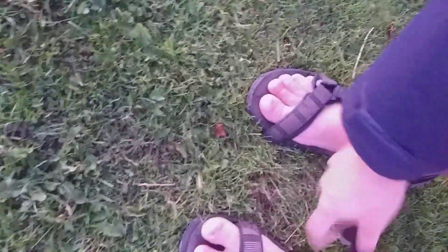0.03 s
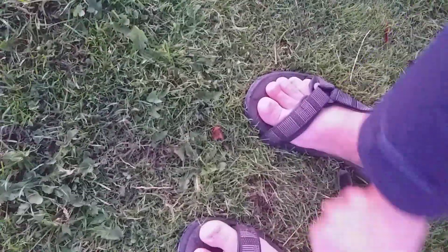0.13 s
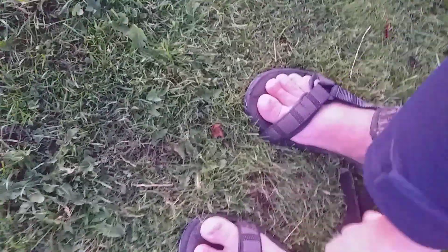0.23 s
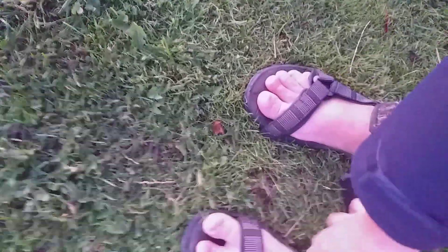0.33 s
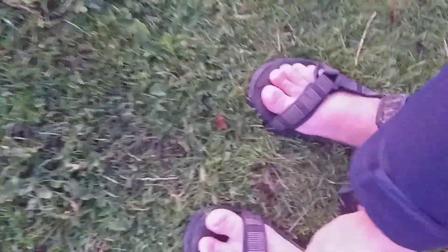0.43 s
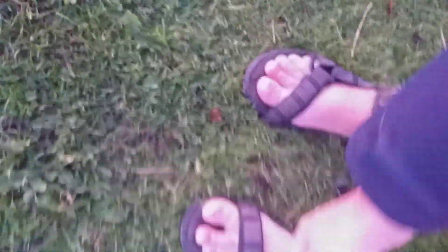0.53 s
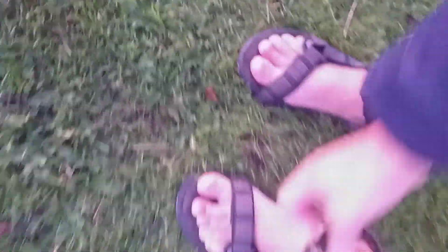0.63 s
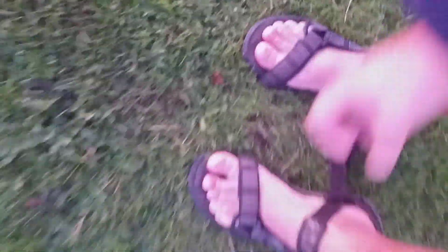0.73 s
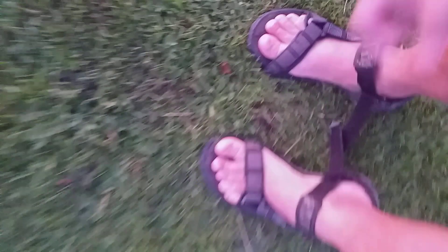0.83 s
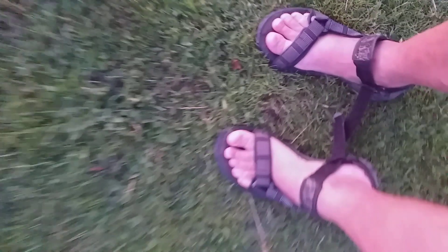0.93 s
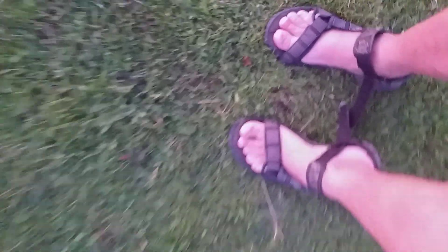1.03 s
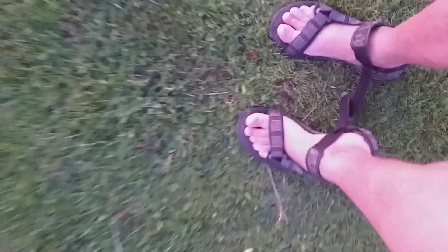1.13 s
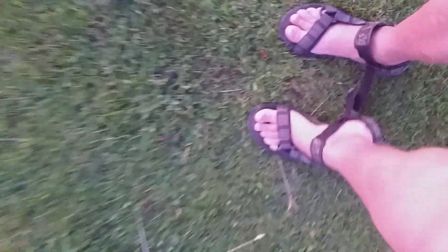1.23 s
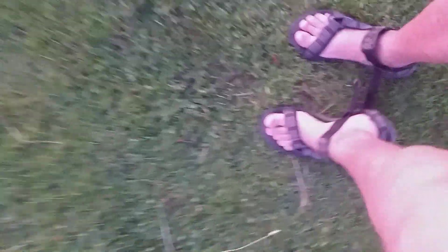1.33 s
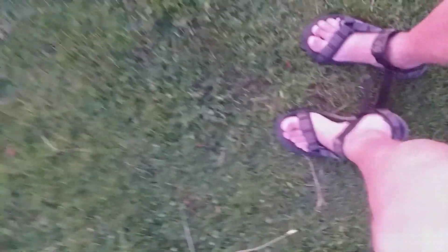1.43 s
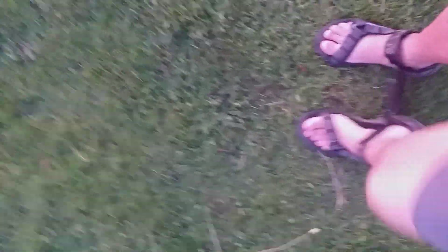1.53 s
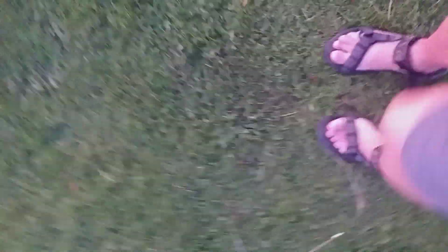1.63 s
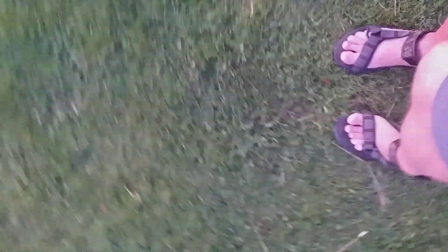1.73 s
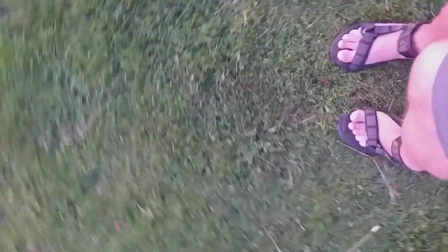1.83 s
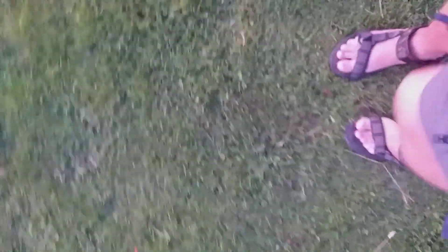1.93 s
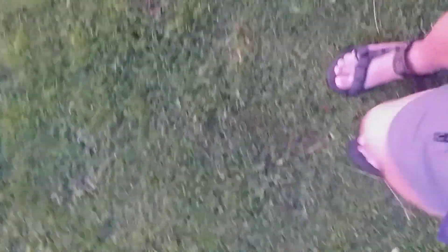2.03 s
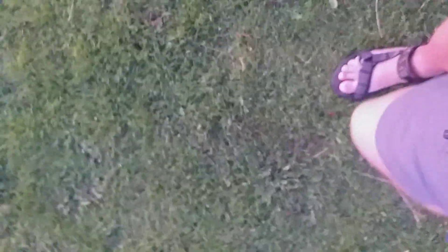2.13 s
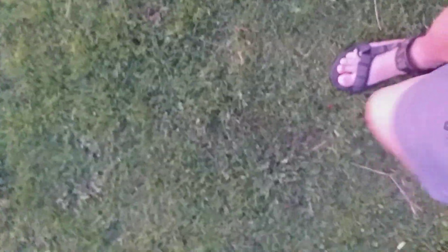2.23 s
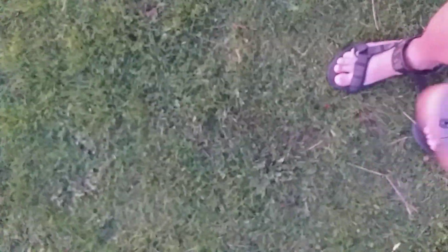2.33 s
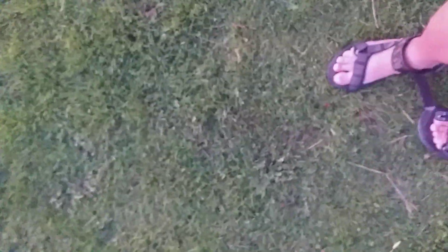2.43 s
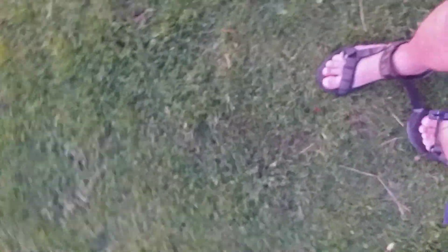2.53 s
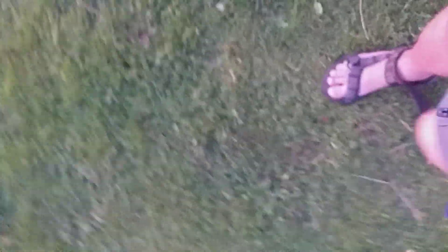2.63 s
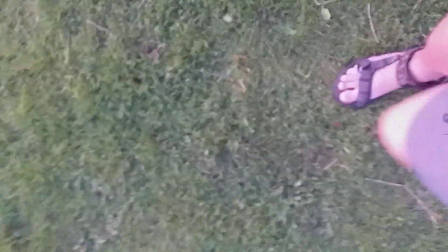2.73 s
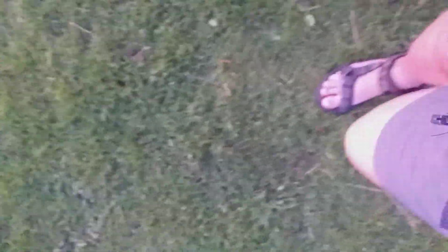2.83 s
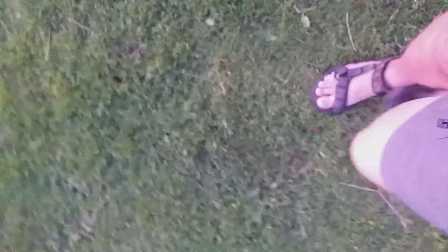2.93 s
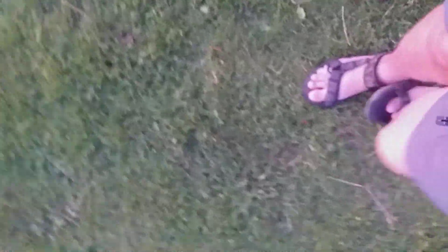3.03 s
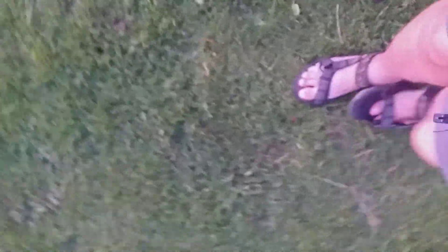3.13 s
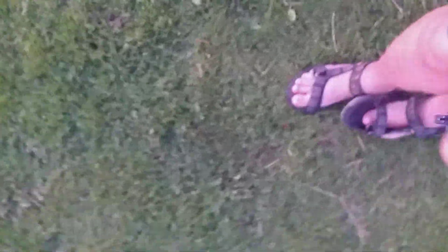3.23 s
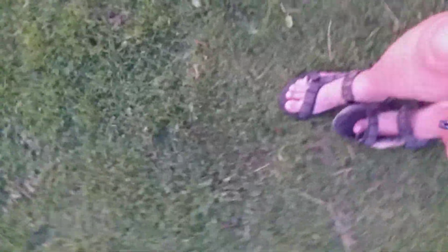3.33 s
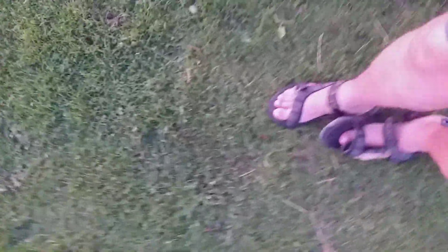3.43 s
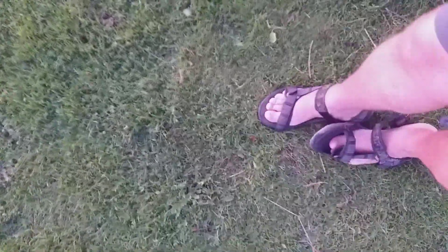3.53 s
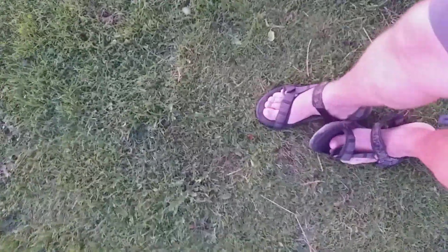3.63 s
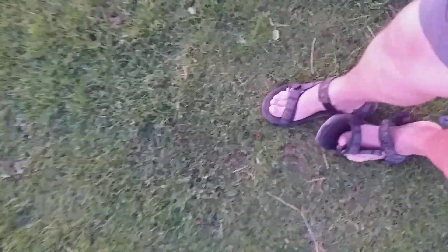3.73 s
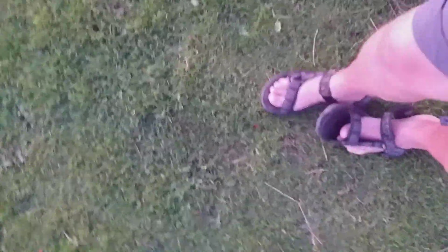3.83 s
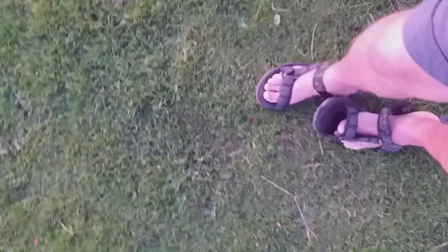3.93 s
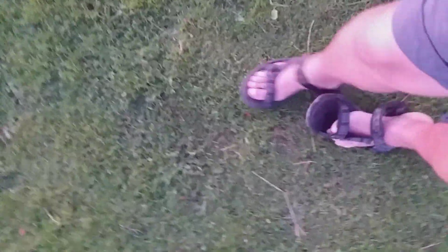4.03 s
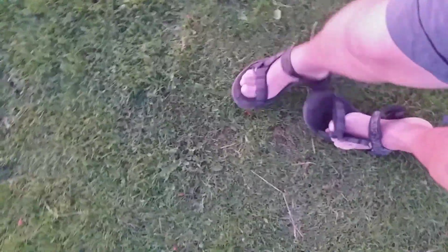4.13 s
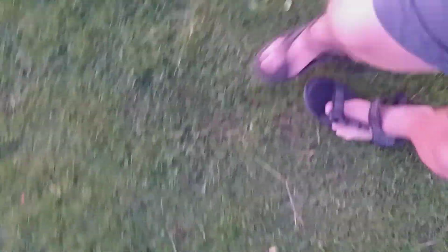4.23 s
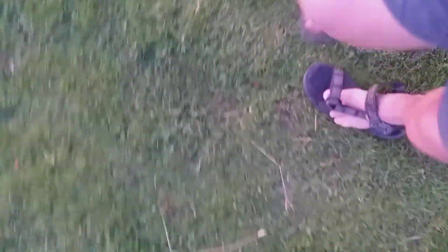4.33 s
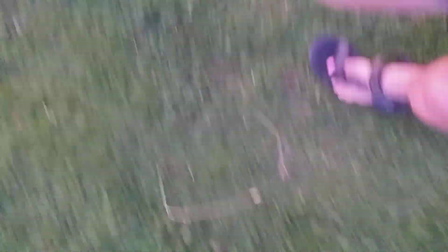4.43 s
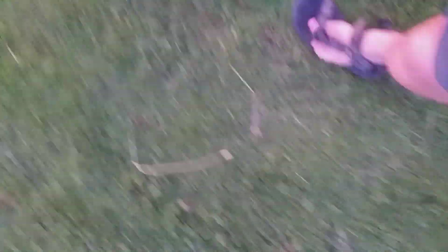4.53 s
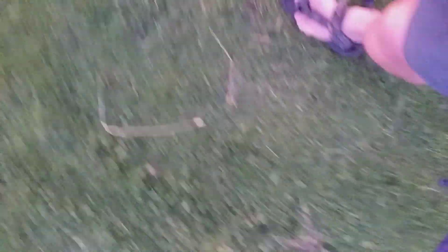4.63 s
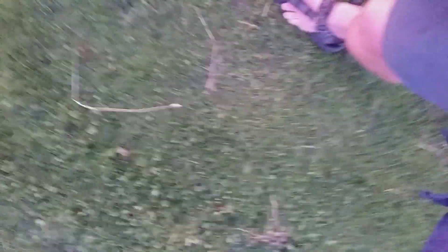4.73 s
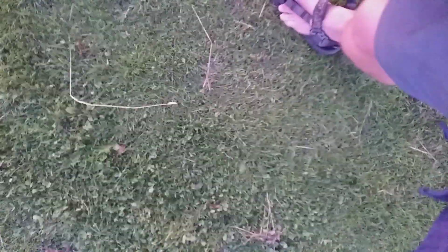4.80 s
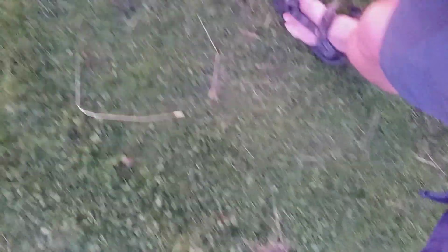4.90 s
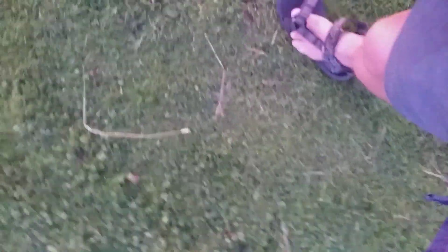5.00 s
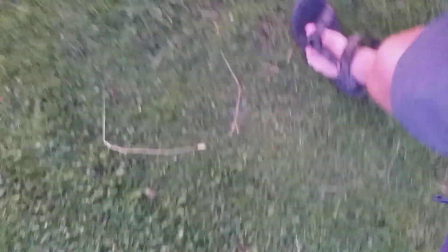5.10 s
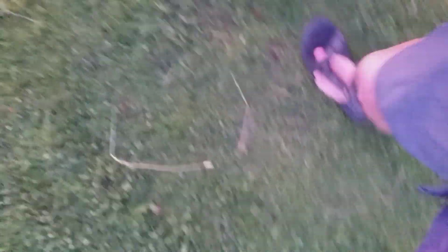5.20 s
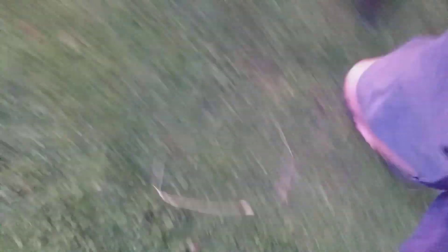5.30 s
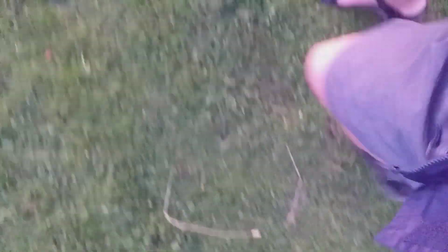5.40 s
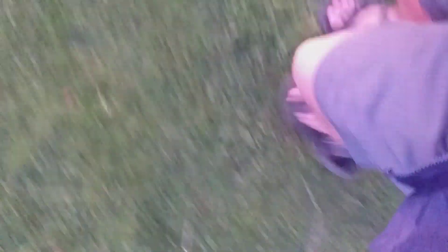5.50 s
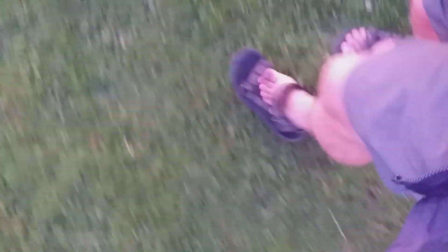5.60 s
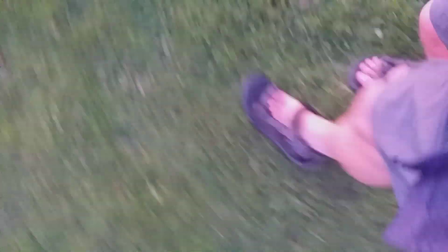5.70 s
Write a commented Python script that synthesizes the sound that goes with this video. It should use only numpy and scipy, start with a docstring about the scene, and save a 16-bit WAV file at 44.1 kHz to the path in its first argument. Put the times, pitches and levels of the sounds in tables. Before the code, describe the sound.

A close, dry, mono outdoor sound on a lawn, about six seconds long. From 0 to 1.2 s gusty wind buffets the microphone with deep irregular thumps and rumble, densest around 0.2-0.45 and 0.7-0.95 s. Under it clothes and grass rustle with a grainy swish, dotted with tiny bright ticks from sandal straps. The wind eases, thumps again near 1.9 s, and fades by about 2.4 s. Then it is quiet: faint rubs of leg and cloth, a few weak ticks and soft distant air. At 3.4 s a single hard, very short knock on the camera case is by far the loudest event. Small snaps cluster around 4.1 s, with a crisp one among them. From 4.3 s soft sandal steps press into turf with low dull crunches and brushing fabric, with brief crackles near 4.9, 5.2-5.45 and 5.6 s, continuing gently to the end.

```python
"""Gusty wind rumbles over a microphone port and its eddies thump there, as filtered noise and pressure pulses.
Someone holding a camera close to the body takes a few soft steps on a lawn. Clothes and grass rustle as
bands of grainy friction noise, soles crunch into the turf, squeezed straps and stalks give short bursts.
Ticks are damped resonances, and one sharp knock rings the modes of the camera's case.
Behind it lies faint, slowly swelling outdoor noise; both channels are the same."""
import sys
import numpy as np
from scipy import signal
from scipy.fft import rfft, irfft
from scipy.io import wavfile
from scipy.ndimage import uniform_filter1d

SR = 44100
rng = np.random.default_rng(int(sys.argv[2]) if len(sys.argv) > 2 else 0)


def master(y):
    """Save y as 16-bit WAV."""
    cut = np.clip(np.atleast_2d(y).T, -1, 1)
    pcm = np.round(cut * 32767)  # scale
    wavfile.write(sys.argv[1], SR, pcm.astype(np.int16))


N = 254016
TOP_HZ = 15900  # upper edge of the sound
# the strongest eddies hitting the port: (t/s, peak suction level/dB, f/Hz)
EDDY_HITS = [(.064, -22, 157), (.185, -13.5, 150), (.209, -18.5, 200), (0.251, -10, 162), (0.276, -15, 128),
             (0.319, -13.5, 206), (0.325, -11, 130), (.371, -14.5, 111), (0.438, -18.5, 142),
             (.684, -11.5, 120), (.725, -16, 151), (0.777, -17, 111), (0.835, -13, 196),
             (0.906, -14.5, 109), (1.023, -20.5, 210), (1.064, -19.5, 170), (1.122, -22.5, 263),
             (1.134, -19, 151), (1.214, -21, 164), (1.509, -27, 130), (1.605, -27.5, 130),
             (1.659, -24, 115), (1.865, -21.5, 115), (1.901, -11.5, 157), (1.921, -13, 121),
             (2.047, -23, 118), (2.149, -20.5, 107), (2.252, -26, 108), (2.322, -24, 92.9),
             (2.414, -35.5, 89), (2.62, -38, 99), (2.699, -39, 95), (3.529, -42.5, 89), (3.89, -42, 89),
             (3.992, -42, 89), (4.093, -39.5, 100)]


def undb(db):
    """Decibels to gain."""
    return 10 ** (np.asarray(db) / 20)


def unit(x):
    """Scale to rms 1."""
    return x / np.sqrt(np.mean(x ** 2))


def curves(table):
    """Interpolate each column of a time table to one value a sample."""
    s, *columns = np.transpose(table)
    return [np.interp(np.arange(N) / SR, s, column) for column in columns]


def colour(x, points):
    """Causal minimum-phase filter with a (f/Hz, level/dB) response, built from its cepstrum."""
    hz, db = np.transpose(points)
    size = 2 * N
    log_hz = np.log(np.fft.rfftfreq(size, 1 / SR) + 1)
    gain = undb(np.interp(log_hz, np.log(hz), db))
    cepstrum = irfft(np.log(gain))
    # folding the cepstrum onto positive time makes the filter causal
    cepstrum[1:N] *= 2
    cepstrum[N + 1:] = 0
    return irfft(rfft(x, size) * np.exp(rfft(cepstrum)))[:N]


def walk(rate):
    """Random levels held for 1 / rate seconds and smoothed twice, with rms 1."""
    hold = int(SR / rate)
    held = np.repeat(rng.standard_normal(N // hold + 1), hold)
    smooth = uniform_filter1d(uniform_filter1d(held, hold), hold)
    return unit(smooth[:N])


def add(track, s, sound):
    """Mix a short sound into a track at time s."""
    start = max(int(s * SR), 0)
    part = sound[:N - start]
    track[start:start + len(part)] += part


def fade(t, t60):
    """Exponential decay, 60 dB down after t60."""
    return np.exp(-np.log(1000) * t / t60)


def swell(s, half_length, release=1):
    """A smooth bell of level around time s, falling release times slower than it rises."""
    away = (np.arange(N) / SR - s) / half_length
    away = np.where(away > 0, away / release, away)
    return np.exp(-.5 * np.clip(away, -8, 8) ** 2)


def friction(grain_db):
    """Countless tiny slips of uneven size, merging into a grainy noise."""
    sizes = undb(grain_db * rng.standard_normal(N))
    return unit(rng.standard_normal(N) * sizes)


def wind(trim_db=-2.0, flutter_db=2.0, fresh_db=-36, brighten=0.42):
    """Turbulence on the port; light air holds only large, dull eddies, a fresh gust small ones too."""
    # air flow, gusty at first and then dying to a breeze: (t/s, rumble level before the trim/dB)
    air_flow = [(.02, -53), (.11, -36.5), (.2, -29.5), (.44, -35.5), (.56, -44.5), (.68, -29.5),
                (.92, -31.5), (1.2, -30.5), (1.3, -44), (1.41, -45), (1.48, -37), (1.87, -37.5),
                (1.98, -49), (2.08, -33.5), (2.2, -44), (2.38, -44.5), (2.5, -73), (2.68, -48), (2.9, -67),
                (3.67, -64), (3.95, -58), (4.2, -64)]
    # spectrum of the turbulence: (f/Hz, relative level per Hz/dB)
    wind_colour = [(30, -17), (65, 4), (125, 3), (200, -4.5), (290, -13.5), (370, -25), (500, -25),
                   (1000, -64)]
    swirl_db, swirl_s = -15, 0.016  # turbulence around an eddy: level against its peak, half length

    mean_db, = curves(air_flow)
    swirl_power = sum((undb(db + swirl_db) * swell(s, swirl_s)) ** 2 for s, db, hz in EDDY_HITS)
    steady_power = undb(mean_db + trim_db + flutter_db * walk(34.94)) ** 2
    flow_db = 10 * np.log10(steady_power + swirl_power)
    turbulence = unit(colour(rng.standard_normal(N), wind_colour))
    # the flow sets the strength of the swirl, chance only its shape
    turbulence /= np.sqrt(uniform_filter1d(turbulence ** 2, size=1500))
    lowpass = signal.butter(3, 150, fs=SR, output="sos")
    large = signal.sosfiltfilt(lowpass, turbulence)
    small_db = np.clip(brighten * (flow_db - fresh_db), -14, 0)
    small = (turbulence - large) * undb(small_db)
    return (large + small) * undb(flow_db)


def eddies(core=2.47, wake_db=-19, wake_hz=470):
    """A vortex crossing the port: sharp suction in its core, gentler pressure on either side, a small wake."""
    out, t = np.zeros(N), np.arange(-1024, 1024) / SR
    wake_band = signal.butter(2, [wake_hz / 1.5, wake_hz * 1.5], "band", fs=SR, output="sos")
    for s, db, hz in EDDY_HITS:
        radius = 2 * np.pi * hz * t / core
        pressure = (3 * radius ** 2 - 1) / (1 + radius ** 2) ** 3
        wake = unit(signal.sosfilt(wake_band, rng.standard_normal(len(t))))
        wake *= np.exp(-(radius / 2) ** 2)
        # the wake grows with the square of the strength, so only hard buffets crack
        add(out, s + t[0], undb(db) * pressure + undb(2 * db + wake_db) * wake)
    return out


def rubbing(straighten_db=1):
    """Level, weight and crispness of all rubbing; whichever motion is strongest lends its character."""
    # clothes rub without a break while the walker straightens up:
    # (t/s, level before straighten_db/dB, weight of the rub/dB, crispness/dB)
    straightening = [(0.03, -51, -2.5, -1.5), (0.056, -50, -10.5, 2.5), (0.258, -50, -4, 2),
                     (0.264, -47, -8, 1), (0.504, -50, -5, -1), (0.848, -41.5, -3.5, -4),
                     (0.992, -45, -9.5, -7), (1.098, -43.5, -8, -5), (1.676, -49.5, -3, -5),
                     (1.864, -43, -5.5, -7.5), (1.95, -55.5, -3.5, -13)]
    # single moves of a leg or foot:
    # (t/s, level/dB, half length of the rise/s, weight of the rub/dB, crispness/dB)
    moves = [(2.022, -49, 0.033, -4, -9.5), (2.202, -56.5, 0.08, -6, -9), (2.351, -48.5, .035, -5, -10.5),
             (2.627, -56.5, 0.19, -3.5, -10.5), (2.736, -49, 0.046, -4, -10), (2.936, -52, 0.038, -5, -8),
             (3.157, -50.5, 0.1, -5.5, -7.5), (3.387, -54.5, 0.098, -1.5, -7),
             (3.691, -55, 0.052, -4.5, -9.5), (3.835, -60.5, 0.03, -9, 0), (4.163, -56.5, 0.083, 0.5, -6),
             (4.321, -41, 0.055, -2, -11), (4.475, -47, 0.086, -3, -7.5), (4.647, -52, 0.042, 1, -7),
             (4.8, -55, 0.036, 2.5, -5.5), (4.956, -48.5, 0.042, -5, -7), (5.094, -49, 0.056, -3.5, -2),
             (5.191, -43, 0.037, -3, -12.5), (5.262, -47, 0.024, -0.5, -4), (5.402, -50, 0.13, -5, -8.5),
             (5.592, -50.5, 0.033, -2, -7), (5.724, -47, 0.094, -4.5, -13.5)]
    # faint rubbing between moves: (level/dB, weight of the rub/dB, crispness/dB)
    still_db, still_weight_db, still_crisp_db = (-64, 1, -6)
    settle_t60 = 0.61  # s, the first rubbing dies away once upright
    release = 1.49  # a move dies away this many times slower than it builds

    rub_db, weight_db, crisp_db = curves(straightening)
    upright_s = np.maximum(np.arange(N) / SR - straightening[-1][0], 0)
    straighten_size = undb(rub_db + straighten_db) * fade(upright_s, settle_t60)
    motions = [(straighten_size, weight_db, crisp_db), (undb(still_db), still_weight_db, still_crisp_db)]
    for s, db, half_length, weight, crisp in moves:
        motions.append((undb(db) * swell(s, half_length, release), weight, crisp))
    power = sum(size ** 2 for size, _, _ in motions)
    weight_db = sum(size ** 2 * weight for size, weight, _ in motions) / power
    crisp_db = sum(size ** 2 * crisp for size, _, crisp in motions) / power
    return 10 * np.log10(power), weight_db, crisp_db


def rustle(rub_db, weight_db, crisp_db, scuff_db=1.5, sheen_db=1.0, hiss_db=2.0,
           flicker_db=0.59, sheen_follow=0.59, crackle_db=1.0):
    """Cloth and grass rubbing: a heavy rub adds a dull scuff, a light quick one a sheen and a fine hiss."""
    # spectra of the four layers, dull to fine: (f/Hz, relative level per Hz/dB)
    scuff_colour = [(60, -10), (150, -2), (350, 1), (700, -0.5), (1200, 1), (1900, 1), (2600, -15),
                    (5000, -32)]
    swish_colour = [(1200, -26.5), (2200, -5), (3000, 0), (4400, -2), (5600, -5), (8000, -25.5),
                    (14000, -21)]
    sheen_colour = [(3500, -16), (5500, 2), (8000, -0.5), (10000, -5.5), (14000, -23)]
    hiss_colour = [(6000, -14), (9000, 1), (11000, 1), (16000, -1.5)]

    scuff = unit(colour(friction(grain_db=6.5), scuff_colour)) * undb(weight_db + scuff_db)
    swish = unit(colour(friction(grain_db=4.5), swish_colour))
    sheen = unit(colour(friction(grain_db=6.0), sheen_colour)) * undb(sheen_follow * crisp_db + sheen_db)
    hiss = unit(colour(friction(grain_db=5.0), hiss_colour)) * undb(crisp_db + hiss_db)
    # blades catch and let go, which roughens the two lower bands
    catching = undb(crackle_db * walk(500))
    layers = (scuff + swish) * catching + sheen + hiss
    return layers * undb(rub_db + flicker_db * walk(70))


def treads():
    """A sole rolls onto the turf and crushes it with a soft, low crunch."""
    # weight pressing into the turf: (t/s, level/dB, half length/s)
    footfalls = [(4.31, -41, 0.031), (4.402, -44, 0.032), (4.492, -48, 0.056), (4.665, -53, 0.064),
                 (4.806, -56.5, 0.058), (5.178, -53.5, 0.13), (5.3, -57.5, 0.048), (5.397, -51.5, 0.048),
                 (5.75, -51.5, 0.056)]
    # spectrum of the crushed turf: (f/Hz, relative level per Hz/dB)
    turf_colour = [(60, -6.5), (150, -3.5), (300, -4.5), (550, -9.5), (1000, -14), (2500, -33)]
    pressure = sum(undb(db) * swell(s, half_length) for s, db, half_length in footfalls)
    return pressure * unit(colour(friction(grain_db=6), turf_colour))


def crunches(trim_db=-5.0):
    """A few milliseconds of rapid slips, coloured by the strap or stalk that gives way."""
    # squeezed straps and stalks:
    # (t/s, level before the trim/dB, centre f/Hz, width/octaves, half length/s)
    squeezes = [(0.682, -24.5, 2780, 0.61, 0.0011), (4.093, -39.5, 4000, .4, 0.0023),
                (4.149, -39, 4200, 1.1, 0.0053), (4.927, -31, 2950, 1.6, 0.0015),
                (4.933, -30, 7200, 0.66, 0.0015), (5.217, -30.5, 3400, 1.2, .003),
                (5.344, -33.5, 2660, 1.5, 0.0062), (5.362, -33, 2700, 1.4, 0.0068),
                (5.444, -36.5, 2770, .7, 0.008), (5.598, -33, 2100, 0.53, 0.0022),
                (5.604, -38, 2000, 0.41, 0.0042)]
    out, slips = np.zeros(N), friction(grain_db=5)
    for s, db, hz, octaves, half_length in squeezes:
        spread = 2 ** (octaves / 2)
        band = signal.butter(3, [hz / spread, hz * spread], "band", fs=SR, output="sos")
        squeeze = swell(s, half_length)
        burst = squeeze * signal.sosfilt(band, slips)
        # the squeeze sets the energy released, chance only how it is shared among the slips
        evening = np.sqrt(np.sum(squeeze ** 2) / np.sum(burst ** 2))
        out += undb(db + trim_db) * burst * evening
    return out


def stray_ticks(rub_db, count=24, above_rub_db=9, scatter_db=3, low_hz=1500, high_hz=10000, t60=0.0034):
    """Faint snaps at random moments and pitches, louder where the rubbing is: (t/s, level/dB, f/Hz, t60/s)."""
    snaps = []
    for when, size, pitch in rng.random((count, 3)):
        db = rub_db[int(when * N)] + above_rub_db + scatter_db * (2 * size - 1)
        hz = low_hz * (high_hz / low_hz) ** pitch
        snaps.append((when * N / SR, db, hz, t60))
    return snaps


def ticks(snaps, grit_t60=0.014, grit_rms=0.155):
    """Each snap rings one heavily damped resonance and trails off in grit around the same pitch."""
    out, t = np.zeros(N), np.arange(2048) / SR
    for s, db, hz, t60 in snaps:
        band = signal.butter(1, [hz / 2, min(2 * hz, TOP_HZ)], "band", fs=SR, output="sos")
        # such small parts radiate little far below their pitch
        ring = signal.sosfilt(band, np.sin(2 * np.pi * hz * t) * fade(t, t60))
        ring /= np.abs(ring).max()
        grit = unit(signal.sosfilt(band, rng.standard_normal(len(t)))) * fade(t, grit_t60)
        add(out, s, undb(db) * (ring + grit_rms * grit))
    return out


def knock(knock_s=3.4082, knock_db=-5, rise_periods=0.76):
    """A hard tap on the case: each mode builds up over part of its period, so high ones answer first."""
    # modes of the camera's case: (f/Hz, t60/s, level relative to the knock/dB)
    case_modes = [(230, 0.01, -36), (793, 0.0047, 5), (1050, 0.0055, -6), (1930, 0.016, -21),
                  (3700, 0.0043, -9), (7000, 0.0021, -14.5), (12300, 0.0012, -14), (15200, 0.00076, -9)]
    out, t = np.zeros(N), np.arange(2048) / SR
    for hz, t60, db in case_modes:
        rise = 1 - np.exp(-t * hz / rise_periods)
        ring = -np.sin(2 * np.pi * hz * t) * fade(t, t60)
        add(out, knock_s, undb(knock_db + db) * rise * ring)
    return out


def far_air(air_db=-64):
    """The quiet outdoor background: coloured noise, swelling slowly."""
    # spectrum of distant outdoor air: (f/Hz, relative level per Hz/dB)
    far_colour = [(40, -2), (100, 13), (300, -12.5), (1300, 2), (2500, -26), (8000, -21), (16000, -52)]
    return unit(colour(rng.standard_normal(N), far_colour)) * undb(air_db + walk(1.85))


def scene():
    """Everything is close and dry; one microphone feeds both channels."""
    # ticks of straps and dry stalks: (t/s, peak level of the ring/dB, f/Hz, t60/s)
    strap_snaps = [(.1886, -24, 4000, 0.0022), (.2313, -30.5, 1590, .007), (.269, -26, 13000, 0.0014),
                   (.3948, -24, 12000, .002), (.4113, -27.5, 2800, 0.0016), (.9564, -23, 1690, 0.0033),
                   (1.298, -26, 13000, 0.0026), (1.5118, -23, 2800, 0.0011), (1.8755, -28, 14500, .004),
                   (1.8975, -23.5, 7800, 0.0027), (2.0549, -20.5, 1774, 0.0012),
                   (2.4344, -33, 1340, 0.0035), (2.8, -33.5, 1070, .004), (3.91, -41.5, 3480, 0.0056),
                   (4.062, -31, 1040, .005), (4.0994, -35, 886, .0045), (4.1268, -20, 4230, 0.00079),
                   (4.1832, -24, 1440, .0065), (4.385, -27.5, 700, 0.0027), (4.676, -33, 800, 0.0031),
                   (4.703, -33, 2930, 0.0037)]
    rub_db, weight_db, crisp_db = rubbing()
    mono = wind() + eddies()
    mono += rustle(rub_db, weight_db, crisp_db) + treads() + crunches()
    mono += ticks([*strap_snaps, *stray_ticks(rub_db)])
    mono += knock() + far_air()
    return np.array([mono, mono])


def record(dry):
    """The port colours the sound and a steep low-pass cuts the top."""
    # response of the microphone behind its port: (f/Hz, level/dB)
    port_response = [(22, -37), (35, -17), (60, 1.5), (1900, -0.5), (2300, -4), (2900, -2.5), (3500, -3.5),
                     (4300, 0.5), (5200, -3.5), (7700, 1.5), (9100, -8.5), (10800, -1), (15500, 3)]
    heard = np.array([colour(channel, port_response) for channel in dry])
    lowpass = signal.ellip(10, .2, 80, TOP_HZ, fs=SR, output="sos")
    return signal.sosfilt(lowpass, heard)


dry = scene()
out = record(dry)
master(out)
```